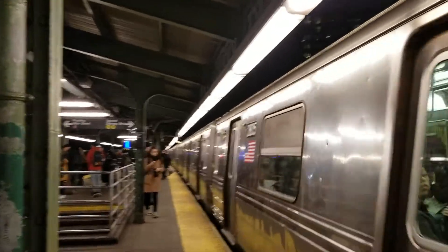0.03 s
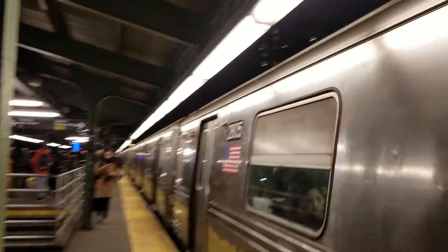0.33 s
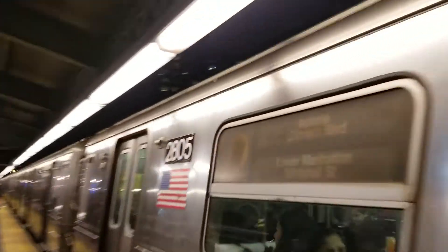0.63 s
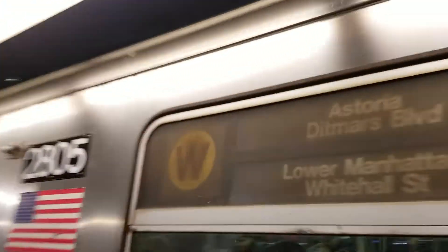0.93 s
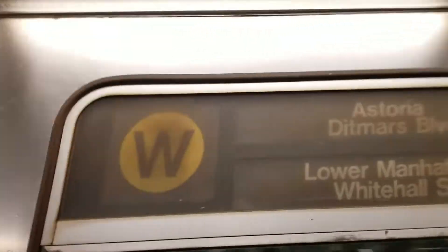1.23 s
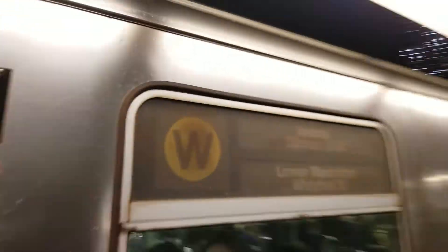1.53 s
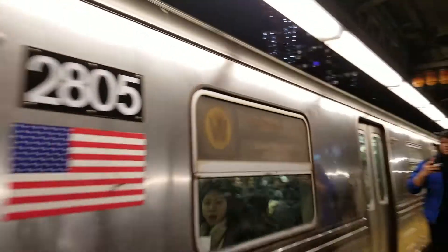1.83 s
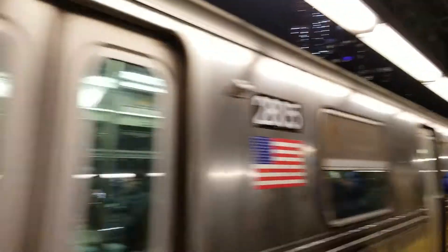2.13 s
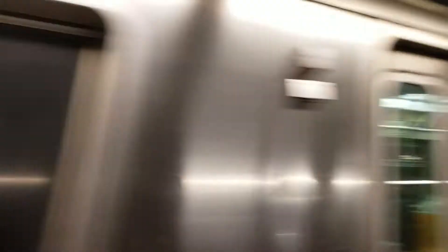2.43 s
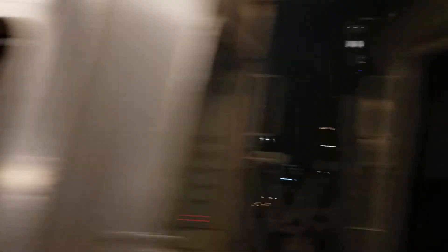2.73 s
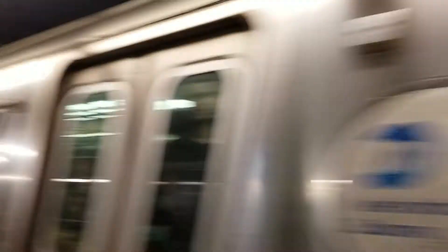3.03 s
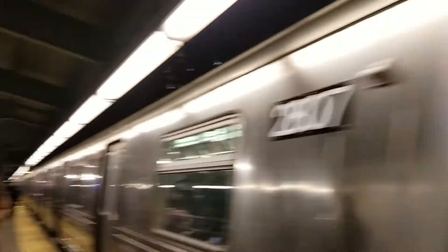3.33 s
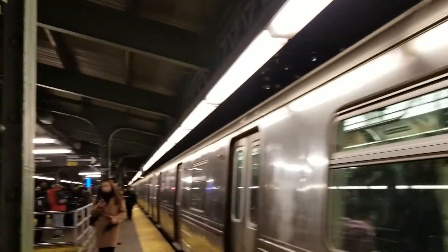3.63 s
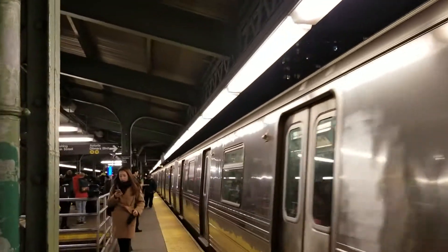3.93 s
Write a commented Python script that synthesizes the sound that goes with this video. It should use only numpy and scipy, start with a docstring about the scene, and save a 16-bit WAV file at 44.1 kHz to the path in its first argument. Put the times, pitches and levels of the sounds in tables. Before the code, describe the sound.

A subway train passes very close on an elevated platform, with a deep rumble, roar and hiss throughout. A high metallic ringing fades over the first two seconds. Wheels clack at about 0.9, 1.4, 2.5 and 3 seconds, each followed by a short, slightly echoing clatter. Thin chirps and ticks come around 1, 1.5 and 2.6 seconds. A faint, unsteady squeal rises from 3.4 seconds to the end.

```python
"""A subway train rolls along an elevated platform, an arm's length from a pair of microphones.
Underfoot the steel deck rumbles and booms; close in, rough wheels roar and hiss on the rail.
Four axles clack over a rail joint, each followed by a clatter of loose gear that rings under the roof.
A singing wheel recedes, flanges chirp, steel ticks, and a faint squeal comes up near the end."""
import sys
import numpy as np
from scipy import signal
from scipy.fft import rfft, irfft
from scipy.io import wavfile
from scipy.ndimage import uniform_filter1d, minimum_filter1d, map_coordinates

SR = 44100
rng = np.random.default_rng(int(sys.argv[2]) if len(sys.argv) > 2 else 0)


def materialize(psi):
    """Save the field psi as 16-bit PCM at rate SR to the path in sys.argv[1].

    A 1-D psi becomes a single channel; in a 2-D psi each row is a channel.
    """
    bounded = np.clip(np.atleast_2d(psi).T, -1, 1)
    quanta = np.round(bounded * 32767).astype(np.int16)
    wavfile.write(sys.argv[1], SR, quanta)


N = 176400
T, HZ = np.arange(N) / SR, np.fft.rfftfreq(N, 1 / SR)

# likeness of the two microphones (frequency [Hz], correlation [-1..1])
MIC_LIKENESS = [(40, .995), (65, .992), (130, 0.965), (280, 0.85), (400, 0.72), (550, 0.6), (800, 0.22),
                (1050, -0.14), (1600, -0.42), (2300, 0.16), (3200, -0.1), (6000, 0)]
# lean across the pair (frequency [Hz], left minus right [dB])
MIC_BALANCE = [(50, -0.5), (280, 0), (600, -1.5), (1100, -1.5), (1700, -5), (2600, 0.5), (4000, 1.7),
               (6000, -2), (8500, 4.5), (15000, 3)]

# Spectra give shape only; all are (frequency [Hz], relative level [dB]).
RUMBLE_SPECTRUM = [(18, -7.5), (26, -4), (36, -0.5), (53, -1), (66, -5.5), (80, -8.5), (98, -12.5),
                   (120, -11), (156, -11), (220, -16)]  # deck and cars, ahead of a low-pass
BODY_SPECTRUM = [(60, -8.5), (90, -4), (119, 1.8), (162, -4.5), (205, -5.5), (255, -7), (320, -12),
                 (400, -19), (600, -32.5)]  # low body of the rolling wheels
ROAR_SPECTRUM = [(240, -14), (380, -1.5), (450, -1), (540, -5.5), (680, -5), (860, -8), (1050, -10),
                 (1300, -12), (1610, -11), (1950, -14.5), (2500, -17), (3200, -20.5), (4200, -25),
                 (5000, -29.5)]  # their midrange roar
FIZZ_SPECTRUM = [(8000, -21), (10000, -7), (10600, -4), (12500, 2.5), (14000, -1), (15700, 2.5)]  # overtones of the singing wheel
FAR_CLACK_SPECTRUM = [(250, -1), (500, -4), (1000, -5), (1700, -12), (3000, -22)]  # joints farther down the track
BUMP_SPECTRUM = [(120, -17), (270, 6), (450, -6.5), (800, -16.5), (1600, -19.5), (4000, -32)]  # running gear
TICK_SPECTRUM = [(5000, -23), (7700, 7), (9500, -14), (12500, 7), (14200, 3), (16000, 3)]  # thin ticks of steel
CRACK_SPECTRUM = [(200, 12), (500, 1.5), (900, 11.5), (1100, 5), (1700, 1.5), (2250, 1.5), (2700, -11.5),
                  (4200, -6.5), (6000, -15), (10000, -27), (16000, -21)]  # wheel hitting the near joint
CLATTER_SPECTRUM = [(150, 5), (280, 7), (480, -0.5), (800, 0.5), (1200, -4), (1900, -6.5), (2700, -13),
                    (4200, -16), (7000, -41), (16000, -44)]  # loose gear shaking
SCRAPE_SPECTRUM = [(2000, 1), (3800, 3), (5000, 5), (6200, 3.5), (7500, 0.5), (9000, -3), (12000, 0),
                   (16000, -9)]  # loose gear scraping
CHIRP_SPECTRUM = [(4900, -35), (5350, -16), (5650, 0.5), (6000, 2.5), (6480, -1), (6850, -12), (8000, -22),
                  (10000, -39), (12300, -16), (16000, -29)]  # flange chirps

# Swells and fades heard from the platform; all are (time [s], level [dB]).
RUMBLE_LEVEL = [(0, -18), (.5, -14.5), (.9, -15.5), (1.1, -13), (1.45, -14), (1.7, -16), (2.1, -12.5),
                (2.8, -13), (3.3, -14.5), (3.65, -17), (4, -19.5)]
BOOM_LEVEL = [(0, -26), (.3, -28), (.6, -23.5), (.93, -16), (1.15, -43), (1.8, -22.5), (2.1, -13),
              (2.7, -17.5), (3.2, -13.5), (3.55, -21.5), (4, -17)]
BODY_LEVEL = [(0, -21), (.4, -22), (.9, -21.5), (1.1, -22.5), (1.5, -18.5), (1.78, -23), (2, -19.5),
              (2.35, -21), (2.7, -18.5), (3.15, -23.5), (3.4, -18.5), (4, -24)]
ROAR_LEVEL = [(0, -32.5), (.27, -32.5), (.55, -30.5), (.8, -30), (1.2, -30.5), (1.55, -28), (1.8, -31),
              (2.3, -29), (2.8, -29.5), (3.3, -29.5), (3.7, -32), (4, -29)]
FIZZ_LEVEL = [(0, -37), (.5, -41), (1, -42), (1.25, -50), (1.8, -65), (4, -70)]
SQUEAL_LEVEL = [(3.25, -62), (3.4, -46.5), (3.55, -42), (3.66, -46), (3.745, -44), (3.775, -33.5),
                (3.82, -39.5), (3.87, -40.5), (3.91, -36.5), (3.95, -40), (4, -38)]

# Single strikes along the train; all are (time [s], level [dB]).
FAR_CLACKS = [(.245, -23.5), (.73, -30)]
BUMPS = [(.51, -24.5), (.725, -16.5), (1.25, -16), (1.405, -19.5), (1.63, -20.5), (2.09, -18.5),
         (2.77, -17)]
TICKS = [(.765, -35), (.97, -36), (1.068, -31.5), (1.4387, -29), (1.4592, -29), (1.4895, -28),
         (1.5245, -33), (1.548, -36), (1.579, -34), (2.12, -37), (2.555, -32), (2.593, -36), (2.632, -36)]
CHIRPS = [(.895, -27), (.907, -24.5), (.928, -25), (.9362, -16), (.948, -20.5), (.9641, -19.5), (.971, -27),
          (.988, -24.5), (.9991, -25), (1.014, -25.5), (2.5957, -29), (2.632, -24.5), (3.094, -30)]

# heaves of the deck (time [s], level [dB], pitch [Hz], half length [s])
HEAVES = [(0.084, -7, 55, 0.028), (0.188, -5, 46, 0.023), (0.279, -10, 38, 0.025), (.905, -8, 55, .02),
          (0.962, -9, 58, 0.034), (1.481, -8.5, 44, 0.043), (2.096, -14.5, 105, 0.054),
          (2.48, -4, 55, 0.01)]
# hiss of steel on steel (frequency [Hz], left relative level [dB], right relative level [dB])
HISS_SPECTRUM = [(2500, -17, -33), (4200, -3.5, 0), (5260, 1, -2), (6000, -2, 5.5), (6460, 2, -1),
                 (7340, -5, -4.5), (7870, -1.5, -9.5), (8740, -8, -10.5), (10100, -9.5, -9),
                 (12100, -4, -9), (14300, -8, -8.5), (17300, -0.5, -5.5)]
# its swell at each microphone (time [s], left level [dB], right level [dB])
HISS_LEVEL = [(0, -37.5, -36), (.9, -40.5, -38.5), (1.25, -40, -39), (1.55, -39, -39), (1.85, -40.5, -40),
              (2.45, -34.5, -35.5), (2.75, -39, -36.5), (3.1, -40, -34.5), (3.45, -42, -40),
              (4, -41.5, -39)]
# modes of the singing wheel (starting pitch [Hz], half width [Hz], relative level [dB])
SINGING_MODES = [(1030, 120, -1), (1590, 230, 4), (2080, 250, -12), (2610, 120, -5.5), (3080, 49, -8),
                 (3740, 70, -8.5), (4250, 90, -8), (5580, 120, -3.5), (6200, 46, -12), (6690, 120, -4),
                 (10600, 130, -10), (12700, 300, -9)]
# axles over the near joint (time [s], knock [dB], knock pitch [Hz], knock t60 [s], crack [dB],
# clatter [dB], clatter length [s], scrape [dB], scrape rise [s], wheel ring [dB])
CLACKS = [(0.855, -24.5, 780, .27, -23, -28.5, 0.15, -38, 0.063, -37.5),
          (1.394, -24.5, 885, 0.16, -29.5, -26, 0.13, -37.5, 0.06, -38.5),
          (2.5014, -24, 800, 0.11, -18, -22.5, .14, -33.5, 0.059, -33),
          (3.049, -19.5, 684, 0.11, -27.5, -31.5, 0.11, -40, 0.073, -38)]
# modes of a struck wheel (pitch [Hz], relative level [dB])
STRUCK_MODES = [(1160, 2), (1345, 6), (1670, 8), (2240, -7), (2850, -3), (3430, 3), (4220, 0.5), (4950, -5)]
# passing resonances of cars and deck, and a motor's whine (time [s], level [dB], pitch [Hz], half length [s])
DRONES = [(1.497, -27, 109.5, 0.2), (2.146, -22.5, 114.5, 0.38), (2.195, -30.5, 338, 0.17),
          (3.707, -25.5, 115, 0.34)]
# the squealing wheel mode (time [s], pitch [Hz])
SQUEAL_PITCH = [(3.4, 1926), (4, 1926)]

ATTACK_S = 0.0015


def amp(db):
    """Decibels to gain."""
    return 10 ** (np.asarray(db) / 20)


def unit(x):
    """Scales to rms 1."""
    return x / np.sqrt(np.mean(abs(x) ** 2) + 1e-20)


def over_hz(points, column=1):
    """Reads a table along log frequency."""
    table = np.array(points)
    return np.interp(np.log(HZ + 1), np.log(table[:, 0] + 1), table[:, column])


def level(points, column=1):
    """Reads a dB curve as gain over time."""
    table = np.array(points)
    return amp(np.interp(T, table[:, 0], table[:, column]))


def colour(points, column=1):
    """Gain of a spectrum table, falling steeply past its ends."""
    above = 1 + (HZ / points[-1][0] / 1.15) ** 12
    below = 1 + (points[0][0] / 1.15 / (HZ + 1)) ** 12
    return amp(over_hz(points, column)) / np.sqrt(above * below)


def peak(hz, half_width_hz):
    """Gain of one resonance."""
    return 1 / (1 + ((HZ - hz) / half_width_hz) ** 2)


def wobble(rate_hz):
    """Smooth random motion of rms 1."""
    return unit(irfft(rfft(rng.standard_normal(N)) / (1 + (HZ / rate_hz) ** 4), N))


def pan(db):
    """Gains for the two microphones; positive leans left."""
    return amp(np.array([[db], [-db]]) / 2)


def mic_noise(gain, tilt=True):
    """Coloured noise at the pair: alike in the bass, unrelated in the treble; tilt adds MIC_BALANCE."""
    mid, side = rfft(rng.standard_normal((2, N)))
    likeness = np.clip(over_hz(MIC_LIKENESS), -1, 1 - 1e-4)
    mid, side = mid * np.sqrt(1 + likeness), side * np.sqrt(1 - likeness)
    lean = amp(over_hz(MIC_BALANCE) / 2) if tilt else 1
    return unit(irfft(np.array([(mid + side) * lean, (mid - side) / lean]) * gain, N))


def steadied(x, share):
    """Evens out the swells of a noise, as in a steadily driven vibration."""
    power = uniform_filter1d((abs(signal.hilbert(x)) ** 2).mean(0), size=1500)
    return unit(x / (abs(power) + 1e-6) ** (share / 2))


def blow(start, rise_s, t60, hold_s=0):
    """Envelope: rise, hold, exponential release."""
    age = T - start
    return np.clip(age / rise_s, 0, 1) * amp(-60 * np.maximum(age - hold_s, 0) / t60)


def swell(centre_s, half_s):
    """Bell-shaped envelope."""
    return np.exp(-((T - centre_s) / half_s) ** 2)


def tone(hz, wander_hz, rate_hz):
    """A sustained vibration whose pitch wanders."""
    return unit(np.sin(2 * np.pi * np.cumsum(hz + wander_hz * wobble(rate_hz)) / SR))


def strikes(rows, spectrum, rise_s, t60):
    """Short excitations of one dense set of resonances."""
    power = sum((amp(db) * blow(s, rise_s, t60)) ** 2 for s, db in rows)
    return mic_noise(colour(spectrum), tilt=False) * np.sqrt(power)


def deck():
    """The deck underfoot rumbles, booms at its own resonance and heaves under the weight of the cars."""
    low_pass = 1 / (1 + (HZ / 95) ** 6)
    rumble = steadied(mic_noise(colour(RUMBLE_SPECTRUM) * low_pass), share=0.59)
    boom = tone(hz=60.5, wander_hz=1.87, rate_hz=4.27)
    heaves = sum(amp(db) * swell(s, half_s) * tone(hz, wander_hz=2.33, rate_hz=11.7)
                 for s, db, hz, half_s in HEAVES)
    return rumble * level(RUMBLE_LEVEL) * amp(0.5) + boom * level(BOOM_LEVEL) + heaves


def rolling():
    """Rough wheels on rough rail, close by: body, roar and hiss, fluttering together."""
    flutter = wobble(rate_hz=42)
    body = mic_noise(colour(BODY_SPECTRUM)) * level(BODY_LEVEL) * amp(1.54 * flutter)
    roar = mic_noise(colour(ROAR_SPECTRUM)) * level(ROAR_LEVEL) * amp(0.86 * flutter)
    hiss = mic_noise(np.array([colour(HISS_SPECTRUM, mic) for mic in (1, 2)]), tilt=False)
    hiss *= np.array([level(HISS_LEVEL, mic) for mic in (1, 2)])
    return body + roar + hiss * amp(0.5 * flutter + 0.4 * wobble(rate_hz=300))


def singing_wheel():
    """A rubbing wheel rings in its modes, one briefly a tone, fading and sagging as it rolls away."""
    fade_db_per_s, pitch_sag_per_s = 11, 0.028
    modes = sum(amp(db) * peak(hz, width) / np.sqrt(width) for hz, width, db in SINGING_MODES)
    ring = mic_noise(modes, tilt=False)
    ring += amp(-13) * tone(hz=5690, wander_hz=32, rate_hz=44) * blow(0, ATTACK_S, t60=2.5, hold_s=0.33)
    emitted_at = (T - pitch_sag_per_s * T ** 2 / 2) * SR  # read ever slower, so the pitch falls
    receding = np.array([map_coordinates(side, [emitted_at], order=4) for side in ring])
    receding *= amp(-30 - fade_db_per_s * T + wobble(rate_hz=14))
    fizz = mic_noise(colour(FIZZ_SPECTRUM), tilt=False) * level(FIZZ_LEVEL)
    fizz *= amp(0.8 * wobble(rate_hz=60))
    return receding * pan(db=-2.5) + fizz * pan(db=-2)


def far_clacks():
    """Axles strike joints farther down the track."""
    return strikes(FAR_CLACKS, FAR_CLACK_SPECTRUM, rise_s=0.0068, t60=0.41)


def canopy(direct):
    """Adds the reflections between the cars, the platform and its roof."""
    tail = rng.standard_normal((2, N)) * blow(start=0.014, rise_s=0.0079, t60=0.56)
    reflections = signal.fftconvolve(direct, tail / np.linalg.norm(tail[0]), axes=1)[:, :N]
    return direct + amp(-13.5) * reflections


def bumps():
    """The running gear bumps dully."""
    return strikes(BUMPS, BUMP_SPECTRUM, rise_s=0.0092, t60=0.25)


def ticks():
    """Steel ticks thinly, toward the left microphone."""
    return strikes(TICKS, TICK_SPECTRUM, rise_s=0.001, t60=0.055) * pan(db=6)


def clacks():
    """Each axle knocks and cracks on the joint and rings its wheel; loose gear clatters and scrapes."""
    crack = mic_noise(colour(CRACK_SPECTRUM))
    ring = mic_noise(sum(amp(db) * peak(hz, half_width_hz=45) for hz, db in STRUCK_MODES), tilt=False)
    clatter = mic_noise(colour(CLATTER_SPECTRUM)) * amp(1.1 * wobble(rate_hz=32))
    scrape = mic_noise(colour(SCRAPE_SPECTRUM)) * amp(0.6 * wobble(rate_hz=140))
    rail_mode = amp(-0.5) * peak(hz=502, half_width_hz=88)
    out = np.zeros((2, N))
    for (s, knock_db, knock_hz, knock_t60, crack_db,
         clatter_db, clatter_s, scrape_db, scrape_rise_s, ring_db) in CLACKS:
        knock = steadied(mic_noise(peak(knock_hz, half_width_hz=55) + rail_mode), share=1)
        out += knock * amp(knock_db) * blow(s, ATTACK_S, knock_t60, hold_s=0.012)
        out += crack * amp(crack_db) * blow(s, ATTACK_S, t60=0.19, hold_s=0.0083)
        out += ring * amp(ring_db) * blow(s, rise_s=0.014, t60=0.65, hold_s=clatter_s)
        out += clatter * amp(clatter_db) * blow(s, rise_s=0.04, t60=0.41, hold_s=clatter_s)
        out += scrape * amp(scrape_db) * blow(s, scrape_rise_s, t60=0.41, hold_s=clatter_s)
    return out


def chirps():
    """Flanges chirp on the rail, toward the right microphone."""
    return strikes(CHIRPS, CHIRP_SPECTRUM, rise_s=0.00088, t60=0.028) * pan(db=-5)


def drones():
    """Low resonances of the cars and deck, and the whine of a motor, swell up and die away as the cars pass."""
    return sum(mic_noise(peak(hz, half_width_hz=0.069 * hz) ** 2) * amp(db) * swell(s, half_s)
               for s, db, hz, half_s in DRONES)


def flange_rub():
    """A flange grazes the rail in uneven slips, without settling into a tone."""
    graze = mic_noise(peak(hz=2010, half_width_hz=140) ** 2)
    slips = amp(-35 + 3.2 * wobble(rate_hz=70))
    return graze * slips * swell(centre_s=2.265, half_s=0.055)


def squeal():
    """One wheel mode catches and squeals unsteadily, a little to the right."""
    hz = np.interp(T, *np.transpose(SQUEAL_PITCH))
    direct = tone(hz, wander_hz=12.5, rate_hz=59)
    scattered = np.array([tone(hz, wander_hz=25, rate_hz=50.3) * wobble(rate_hz=25) for mic in "LR"])
    return unit(direct + 1.1 * scattered) * level(SQUEAL_LEVEL) * pan(db=-3)


def scene():
    """The train from the platform: rolling and wheel cries arrive direct, the blows with reflections."""
    blows = chirps() + ticks() + bumps() + far_clacks()
    sustained = deck() + drones() + rolling() + singing_wheel() + flange_rub() + squeal()
    return sustained + canopy(blows + clacks())


def record(dry):
    """The microphone pair feeds a limiter that holds peaks to full scale, then a low-pass."""
    safe_gain = minimum_filter1d(1 / np.maximum(abs(dry).max(0), 1), size=601)
    limited = dry * uniform_filter1d(safe_gain, size=601)
    low_pass = signal.firwin(511, cutoff=15800, window=("kaiser", 9), fs=SR)
    return signal.oaconvolve(limited, low_pass[None], "same")


dry = scene()
out = record(dry)
materialize(out)
```